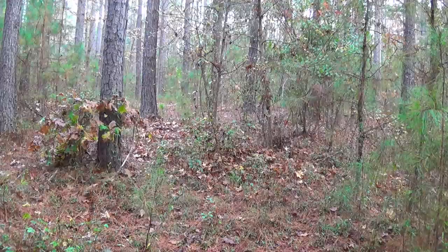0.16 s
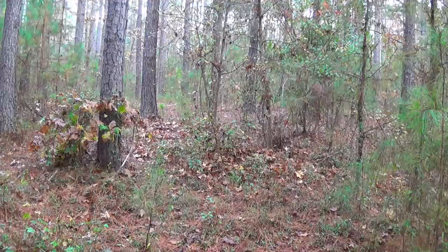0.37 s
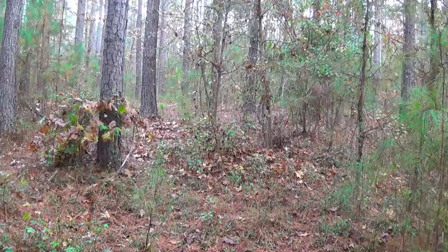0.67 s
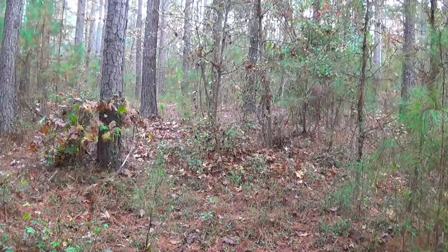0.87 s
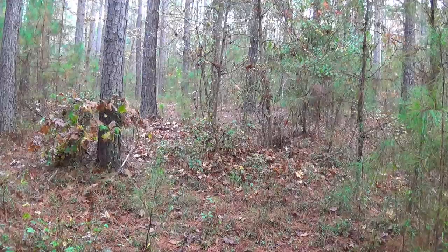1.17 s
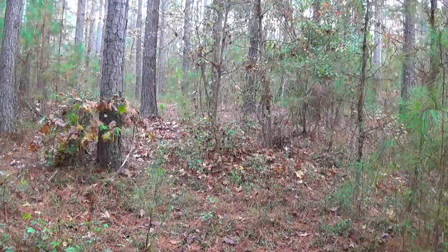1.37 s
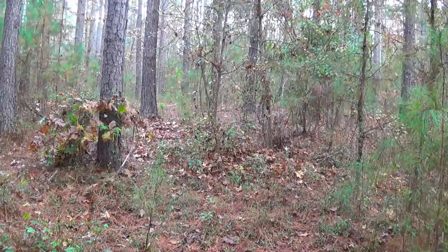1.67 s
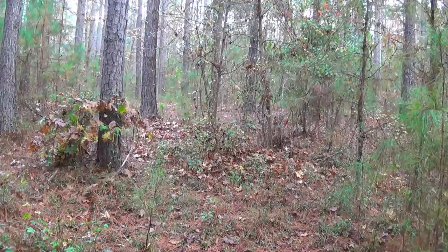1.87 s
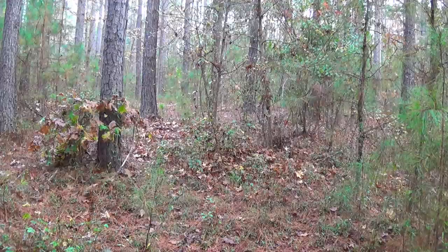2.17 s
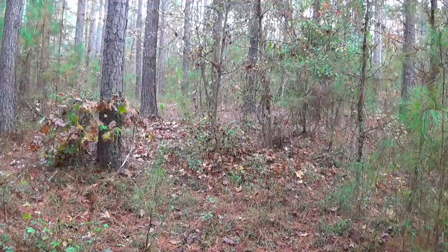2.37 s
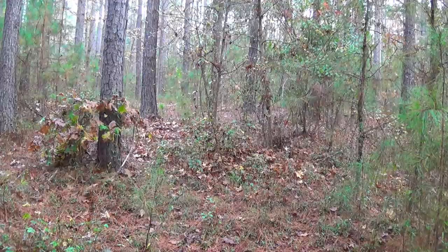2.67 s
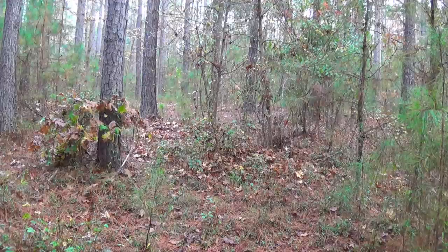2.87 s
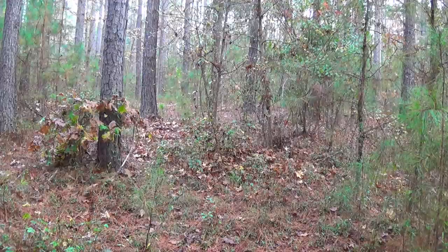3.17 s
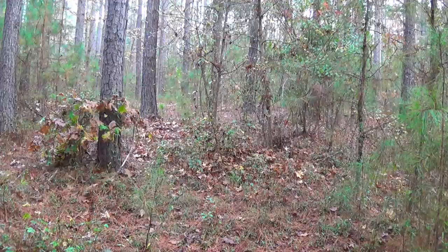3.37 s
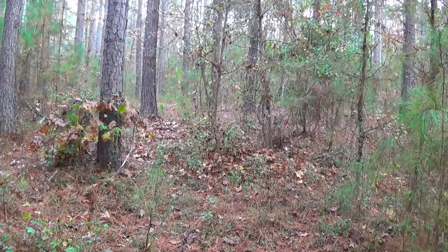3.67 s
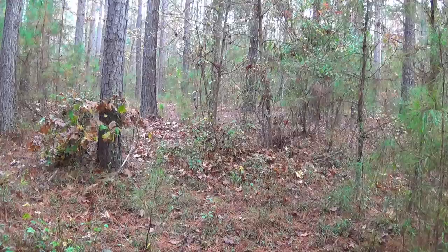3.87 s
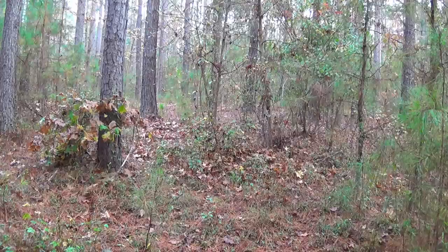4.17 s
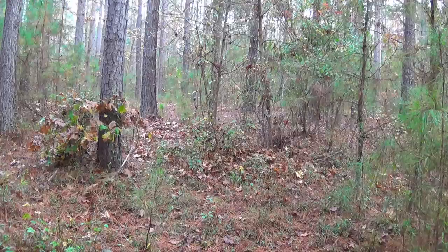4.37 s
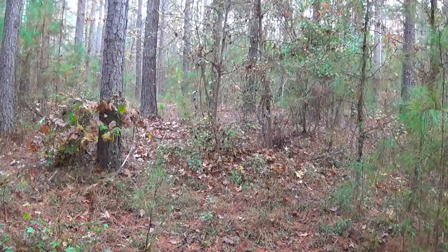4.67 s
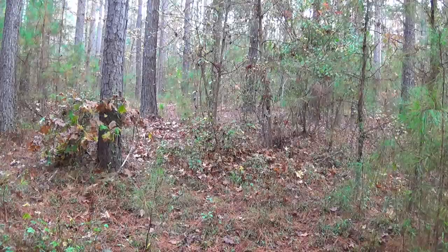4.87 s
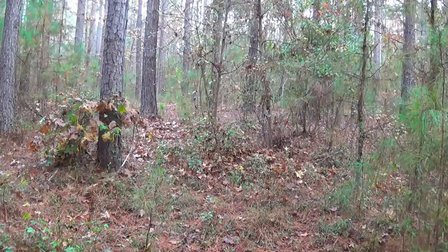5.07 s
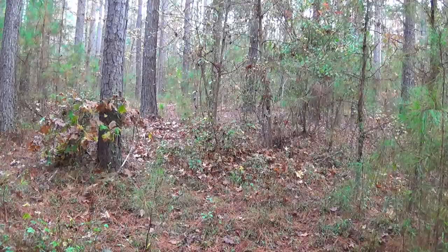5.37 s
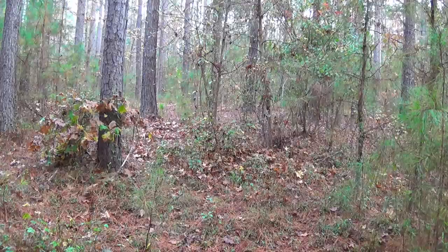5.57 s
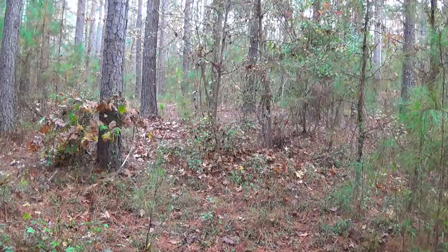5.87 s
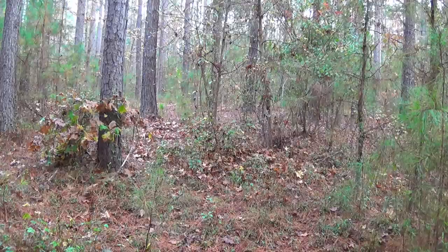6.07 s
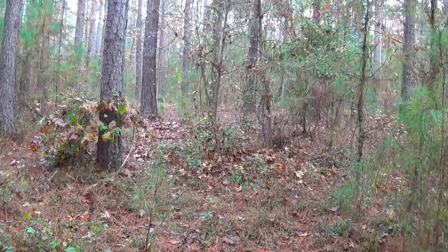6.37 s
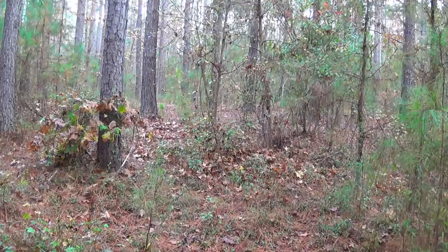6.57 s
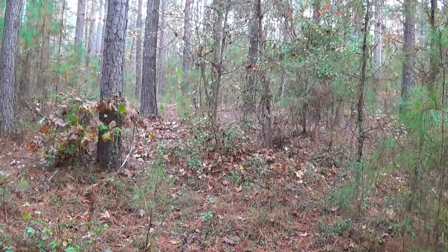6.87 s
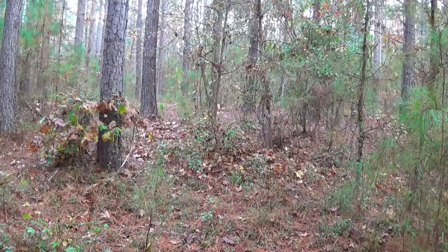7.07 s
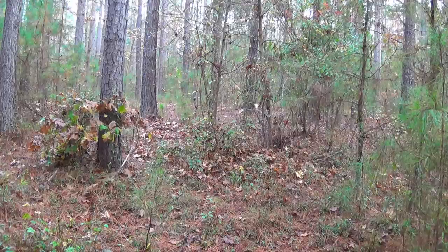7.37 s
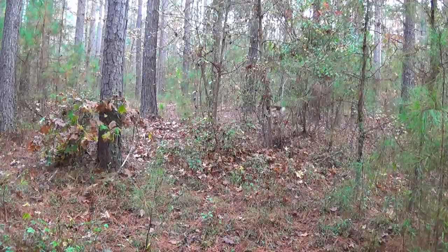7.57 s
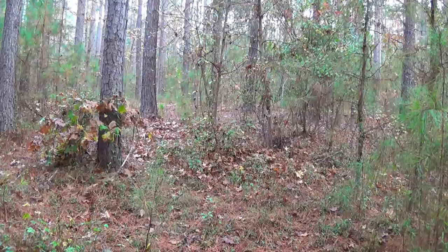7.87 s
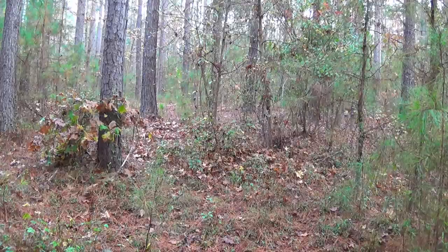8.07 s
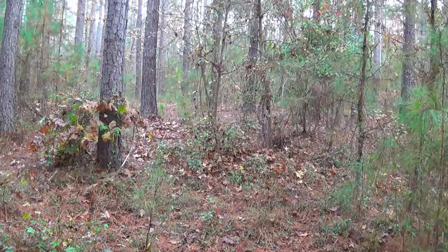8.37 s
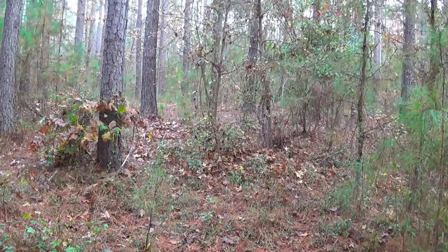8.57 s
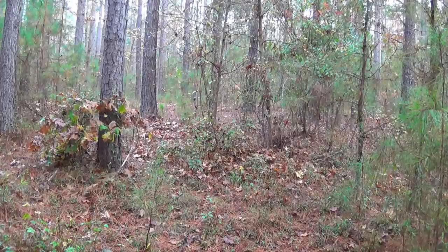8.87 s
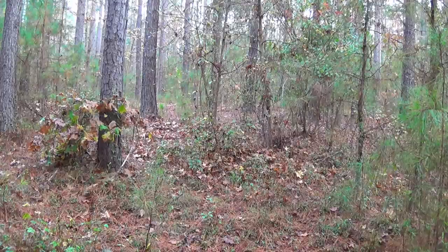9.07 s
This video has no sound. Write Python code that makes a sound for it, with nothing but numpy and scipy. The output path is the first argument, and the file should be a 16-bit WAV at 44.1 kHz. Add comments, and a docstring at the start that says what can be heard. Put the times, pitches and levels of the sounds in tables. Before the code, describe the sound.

Soft woodland air with a faint low rumble and light leaf rustle. From 0 to 2 s distant hounds give short, reverberant howls, mostly mid-pitched with a few higher, gradually strengthening, while small twigs tick at about 0.6, 1.2 and 1.7 s. At 2.1 s nearer dogs join, slightly right: brief bays flipping from a squeak to a hoarse chest note, and piercing yelps around 2.6, 3.0, 3.6 and 4.8 s. Bays continue at 4.0, 4.3, 5.1, 5.6 and 6.3 s, echoes ringing through the trunks. A twig snaps at 5.2 s; a tiny rising bird chip comes at 6.1 s. From 6.5 s fast paws approach, crunching dry leaves loudest at 7.2-7.6 s, with crisp cracks, the sharpest at 7.5 s. A last bay sounds at 7.7 s; footfalls recede, then far howls at 8.4 and 8.6 s fade into the echoing wood.

```python
"""Hounds in a pine wood

Hounds give tongue: yelps leap into a high register, bays break from a squeak into a hoarse low voice,
and others howl far off. Each cry is a harmonic series, roughened by subharmonics, noise and breath, and
filtered by a throat. Sparse decaying impulses are the trunks' echoes. Impulses and hiss are dry leaves,
loudest in crunches as a dog gallops past; noise bursts are cracks, nearly all of them snapping twigs,
a gliding sine is a bird's chip, and shaped noise is the air."""
import sys
import numpy as np
from scipy import signal
from scipy.fft import rfft, irfft, next_fast_len
from scipy.io import wavfile
from scipy.ndimage import uniform_filter1d

SR = 44100
rng = np.random.default_rng(int(sys.argv[2]) if len(sys.argv) > 2 else 0)


def bounce(signal):
    """Save signal as a 16-bit WAV file at the path given by the first command-line argument."""
    frames = np.transpose(np.atleast_2d(signal))
    limited = np.clip(frames, -1, 1)
    pcm = np.round(limited * 32767).astype(np.int16)
    wavfile.write(sys.argv[1], SR, pcm)


N = 406602
LEAD = SR // 2   # samples of cry that precede the scene
TIME = np.arange(N) / SR   # seconds

# Near yelps. Each row: start in seconds, length in seconds, scoop in Hz, leap in Hz, held pitch in Hz,
# scoop level in relative dB, main level in relative dB, last swell in relative dB,
# brightness in dB per octave, basic hoarseness (0-1), jaw opening (0-1).
YELP_CALLS = [(2.606, .122, 662, 1360, 1215, -25, -18.5, -26, 1.5, 0.21, 0.25),
              (3.047, 0.11, 806.2, 1327, 1235, -23.5, -18, -23.5, 2, 0.94, 0.54),
              (3.556, .112, 811, 1289, 1200, -23, -17, -20.5, 1, 0.37, 0.81),
              (4.838, 0.12, 797, 1203, 1179, -25.5, -21.5, -26.5, -3, 0.11, 0.36)]
# Near bays. Each row: start in seconds, squeak length in seconds, chest note length in seconds,
# squeak start in Hz, squeak end in Hz, sag in Hz, crest in Hz, end in Hz, crest place in the chest note (0-1),
# squeak level in dB, chest level in dB, crest level in dB, squeak brightness in dB per octave,
# chest brightness in dB per octave, basic hoarseness (0-1), mouth resonance in Hz.
BAY_CALLS = [(2.075, .027, 0.12, 944, 1256, 640, 700, 573, 0.63, -35, -31, -35.5, 3.5, 4, 0.48, 655),
             (2.541, 0.013, 0.056, 1245, 1240, 618, 653.5, 646, 0.76, -22.5, -27, -26.5, -0.5, 0, .8, 2300),
             (3.983, 0.045, 0.05, 689.7, 880.6, 550.7, 556.5, 500, 0.57, -21.5, -19, -22, 0, 4, 0.45, 1750),
             (4.254, 0.025, 0.075, 2216, 2269, 588.6, 559, 541.4, 0.46, -29.5, -30, -32, -4, 1, 0.5, 566),
             (5.124, .014, 0.096, 1282, 1195, 639, 710, 528.4, .55, -30, -23.5, -26.5, -3, -2, 0.5, 670),
             (5.574, .021, .104, 1168, 1205, 572, 689.6, 516, 0.8, -22.5, -23, -23, 2.5, 2, 0.67, 1390),
             (6.313, 0.036, 0.097, 1024, 1227, 615.8, 679.7, 558.6, 0.54, -27.5, -29.5, -29.5, -7.5, -2, 0.54, 652),
             (7.698, 0.026, 0.11, 1190, 1228, 590, 691, 529, 0.71, -29, -29, -30, 4.5, 0, 0.44, 1460)]
# Far howls. Each row: start in seconds, length in seconds, first pitch in Hz, last pitch in Hz,
# relative level in dB, brightness in dB per octave, hoarseness at the ends (0-1).
HOWL_CALLS = [(-.3, .3, 580, 660, -56, -18, 0.42), (.05, 0.37, 651, 620, -64.5, -27, 0.42),
              (.56, 0.22, 522, 586.5, -51.5, 1.5, .15), (.66, .2, 1264, 1173, -49, 9, 0.15),
              (1.1, 0.29, 580.3, 551.6, -47.5, 6, 0.46), (1.13, 0.18, 878, 949, -48, -5, 0.26),
              (1.48, 0.19, 551, 597.8, -42.5, 5, 0.48), (1.8, 0.152, 595, 566, -45, 5.5, 0.27),
              (7.15, .35, 603.5, 545.4, -52, 3.5, 0.4), (8.43, 0.19, 1211, 1130, -44.5, 4.5, 0.3),
              (8.6, 0.49, 616.5, 600, -50.5, 5.5, 0.48)]
NEAR_LEFT_DB, NEAR_ECHO_LEFT_DB, FAR_LEFT_DB = -5, -5.5, -0.2   # left minus right


def hounds(yelp_db=0.5, far_db=-9):
    """Direct-to-reverberant ratio: near dogs, to the right, sound directly too; far dogs mostly by echo."""
    near = from_db(yelp_db) * pack(YELP_CALLS, yelp) + pack(BAY_CALLS, bay)
    far = pack(HOWL_CALLS, howl)
    near_echo = wood(near, build_s=.04, early_db=-2, early_s=.1, likeness=.68, lumpy_db=2.5)
    far_echo = wood(far, build_s=0.0059, early_db=-21, early_s=0.038, likeness=0.89, lumpy_db=1.5)
    out = pan(near, NEAR_LEFT_DB) + pan(near_echo, NEAR_ECHO_LEFT_DB)
    out += pan(from_db(far_db) * far + far_echo, FAR_LEFT_DB)
    return out[:, LEAD:]


def pack(calls, rule):
    """Superposition: all cries of one kind are laid out in time and summed."""
    out = np.zeros(LEAD + N + SR)
    for call in calls:
        start, voice = cry(*rule(*call))
        out[LEAD + start:LEAD + start + len(voice)] += voice
    return out[:LEAD + N]


# Throat with nearly closed jaws. Each row: frequency in Hz, gain in dB.
YELP_FORMANTS = [(300, -44), (420, -8), (560, 2), (850, 4.5), (1200, 2), (1650, 5), (2000, 2), (2400, 0),
                 (2650, -0.5), (2950, -9), (3700, -18), (4200, -33), (4850, -28.5), (5600, -39),
                 (14000, -64)]
# Throat with wide open jaws. Each row: frequency in Hz, gain in dB.
SHRIEK_FORMANTS = [(400, -32), (580, 4), (850, 1), (1200, 2.5), (1650, -3.5), (2000, -8.5), (2500, -12),
                   (2900, -23.5), (3700, -19.5), (4200, -31), (4850, -17), (5600, -29), (14000, -48.5)]
BREAK_S = 0.00304   # half the time a change of register takes, in yelps and bays
CLEAR_HOARSE = .22   # share of the roughness left once the voice clears
# the run-up to the leap: length, pitch ratio, growth, added roughness
SCOOP_S, SCOOP_RISE, SCOOP_SWELL_DB, SCOOP_HOARSE = .018, 1.09, 9.5, 0.38
LEAP_DIP_DB, SETTLE_S = 8, 0.02375   # the voice is weak just after the leap, then settles
# past the middle the pitch lifts a little and the level drops
WAVER_SHARE, WAVER_RISE, WAVER_LOSS_DB = .67, 1.015, 6.5
# place of the last swell; pitch ratio, loss and roughness at the end
FALL_SHARE, FALL_RATIO, FALL_LOSS_DB, FALL_HOARSE = .84, .81, 4.5, 1


def yelp(s, length, scoop_hz, leap_hz, held_hz, scoop_db, level_db, swell_db, bright_db, hoarse, jaws):
    """Register leap: a scoop jumps high, wavers and falls raggedly, while the jaws set the resonances."""
    leap = s + SCOOP_S + 2 * BREAK_S
    clear = hoarse * CLEAR_HOARSE
    # each row of the course: s, Hz, dB, brightness, hoarseness
    course = [(s, scoop_hz, scoop_db - SCOOP_SWELL_DB, bright_db, hoarse / 2),
              (s + SCOOP_S, scoop_hz * SCOOP_RISE, scoop_db, bright_db, hoarse + SCOOP_HOARSE),
              (leap, leap_hz, level_db - LEAP_DIP_DB, bright_db, hoarse),
              (leap + SETTLE_S, held_hz, level_db, bright_db, clear),
              (s + WAVER_SHARE * length, held_hz * WAVER_RISE, level_db - WAVER_LOSS_DB, bright_db, hoarse),
              (s + FALL_SHARE * length, held_hz * np.sqrt(FALL_RATIO), swell_db, bright_db, clear),
              (s + length, held_hz * FALL_RATIO, swell_db - FALL_LOSS_DB, bright_db, FALL_HOARSE)]
    hz = np.geomspace(300, 14000, 200)
    jaws = np.clip(jaws, 0, 1)
    throat_db = (1 - jaws) * at_hz(YELP_FORMANTS, hz) + jaws * at_hz(SHRIEK_FORMANTS, hz)
    return sorted(course), np.column_stack([hz, throat_db])


# Throat of a baying dog. Each row: frequency in Hz, gain in dB.
BAY_FORMANTS = [(300, -49), (420, -37), (520, 2), (680, 4), (850, 1.5), (1100, 8.5), (1380, 3), (1700, 0),
                (2050, -1), (2400, -4.5), (2900, -23.5), (3700, -31), (6000, -36.5), (14000, -64)]
# landing in the low register: pitch ratio, loss of level, added roughness
BREAK_OVERSHOOT, BREAK_LOSS_DB, BREAK_HOARSE = 1.07, 6.5, 0.12
SQUEAK_SWELL_DB, SQUEAK_HOARSE = 5, 0.094   # the squeak grows and stays nearly pure
# places in the chest note of the sag and of clearing; share of the way to the crest on clearing
SAG_SHARE, CLEAR_SHARE, CLEAR_CLIMB = 0.244, .42, 0.655
CLEAR_LOSS_DB = 7.5   # loss of level as the voice clears
DROP_LOSS_DB, DROP_HOARSE = 4.5, 0.62   # the end of a bay
MOUTH_DB, MOUTH_OCTAVES = 4, 0.11   # height and width (standard deviation) of the mouth resonance


def bay(s, squeak_s, chest_s, from_hz, to_hz, sag_hz, crest_hz, end_hz, crest_share,
        squeak_db, level_db, crest_db, squeak_bright_db, bright_db, hoarse, mouth_hz):
    """Register break: a squeak drops to a rough chest note that clears towards a crest and frays at the end."""
    crack, clear = s + squeak_s, hoarse * CLEAR_HOARSE
    clear_hz = sag_hz + CLEAR_CLIMB * (crest_hz - sag_hz)
    landing_db = level_db - BREAK_LOSS_DB
    # each row of the course: s, Hz, dB, brightness, hoarseness
    course = [(s, from_hz, squeak_db - SQUEAK_SWELL_DB, squeak_bright_db, SQUEAK_HOARSE),
              (crack - BREAK_S, to_hz, squeak_db, squeak_bright_db, SQUEAK_HOARSE),
              (crack + BREAK_S, sag_hz * BREAK_OVERSHOOT, landing_db, bright_db, hoarse + BREAK_HOARSE),
              (crack + SAG_SHARE * chest_s, sag_hz, level_db, bright_db, hoarse),
              (crack + CLEAR_SHARE * chest_s, clear_hz, level_db - CLEAR_LOSS_DB, bright_db, clear),
              (crack + crest_share * chest_s, crest_hz, crest_db, bright_db, clear),
              (crack + chest_s, end_hz, crest_db - DROP_LOSS_DB, bright_db, DROP_HOARSE)]
    hz = np.geomspace(300, 14000, 200)
    mouth = MOUTH_DB * np.exp(-(np.log2(hz / mouth_hz) / MOUTH_OCTAVES) ** 2 / 2)
    return sorted(course), np.column_stack([hz, at_hz(BAY_FORMANTS, hz) + mouth])


# Throat of a howling dog. Each row: frequency in Hz, gain in dB.
HOWL_FORMANTS = [(420, -4.5), (540, 9), (850, -15.5), (1200, 9), (1620, -5.5), (1850, -25), (2400, -10.5),
                 (2900, -36), (8000, -43)]
HOWL_ARCH = 1.005   # pitch bulge at mid-howl, as a ratio


def howl(s, length, from_hz, to_hz, level_db, bright_db, hoarse):
    """Pitch glide: one slightly arched course at an even level, clearer in the middle."""
    course = [(s, from_hz, level_db, bright_db, hoarse),
              (s + length / 2, HOWL_ARCH * (from_hz + to_hz) / 2, level_db, bright_db, hoarse / 2),
              (s + length, to_hz, level_db, bright_db, hoarse)]
    return course, HOWL_FORMANTS


def cry(rows, throat, jitter=.011, attack=.004, release=0.0078):
    """Source and filter: vocal folds, with subharmonics and irregularity when hoarse, excite a throat."""
    s, hz, level_db, bright_db, hoarse = np.transpose(rows)
    start = int((s[0] - attack) * SR)
    t = np.arange(start, int((s[-1] + release) * SR)) / SR
    n = len(t)
    hoarse = np.clip(hoarse, 0, 1)
    hz, level_db, bright_db, hoarse = [np.interp(t, s, c) for c in (hz, level_db, bright_db, hoarse)]
    step = 2 * np.pi * hz * (1 + jitter * wander(72.4, n)) / SR
    # cycles vary in twos in the high register, in threes in the low: side lines between the harmonics
    uneven = np.sin(np.cumsum(step / np.where(hz > 1000, 2, 3)) + .7 * wander(30, n))
    phase = np.cumsum(step) + hoarse * (.6 * uneven + .36 * wander(170, n))
    lags = rng.uniform(0, 2 * np.pi, 17)   # the throat delays each harmonic differently
    folds = np.zeros(n)
    for k in range(1, 17):
        audible = k * hz < SR / 3
        folds += from_db(bright_db * np.log2(k)) * np.cos(k * phase + lags[k]) * audible
    folds = folds * (1 + hoarse * (.55 * uneven + .35 * wander(300, n)))
    # air rushes through while the folds are open
    rush = (.15 + .45 * hoarse) * rng.standard_normal(n) * (1 + np.cos(phase))
    voice = colour(folds + rush * from_db(bright_db), throat)
    voice /= np.sqrt(uniform_filter1d(voice ** 2, size=400) + 1e-12)   # even out, then set the level
    gate = np.interp(t, [t[0], s[0], s[-1], t[-1]], [0, 1, 1, 0])
    return start, voice * gate * from_db(level_db)


# Tone of the wood's echo. Each row: frequency in Hz, gain in dB.
ECHO_TONE = [(300, 3.5), (600, 2.5), (850, 0), (1250, 2), (1700, -3), (2400, -1), (3200, -7.5), (8000, -6)]
# Reverberation time of the wood. Each row: frequency in Hz, time to decay by 60 dB in seconds.
ECHO_DECAY = [(500, 3.16), (1250, 2.39), (2400, 1.14), (4000, 0.83), (10000, 0.16)]


def wood(x, build_s, early_db, early_s, likeness, lumpy_db):
    """Multiple scattering: echoes off trunks grow denser with time and die away, treble first."""
    t = np.arange(2 * SR) / SR
    echoes_per_s = 500 + 8000 * t
    trunks = rng.standard_normal((2, len(t))) * (rng.random((2, len(t))) < echoes_per_s / SR)
    trunks *= from_db(lumpy_db * np.clip(rng.standard_normal(trunks.shape), -2, 2))
    trunks = rms_one(trunks / np.sqrt(echoes_per_s))
    swell = (1 - np.exp(-t / build_s)) * (1 + from_db(early_db) * np.exp(-t / early_s))
    edges = np.geomspace(300, 12000, 13)
    echo = 0
    for low, high in zip(edges, edges[1:]):
        hz = np.sqrt(low * high)
        band = signal.sosfilt(signal.butter(2, [low, high], "band", fs=SR, output="sos"), trunks)
        band = band * swell * from_db(-60 * t / at_hz(ECHO_DECAY, hz))
        # energy in proportion to bandwidth
        band *= np.sqrt(2 * (high - low) / SR / np.sum(band ** 2, axis=1, keepdims=True))
        echo = echo + from_db(at_hz(ECHO_TONE, hz)) * stereo(*band, likeness)
        trunks = -trunks[::-1]   # neighbouring bands get unrelated echoes
    return signal.fftconvolve(x[None], echo, axes=1)[:, :len(x)]


# Leaves stirred by the pack. Each row: time in seconds, relative level in dB.
STIRRED_LEAVES = [(0.0, -60.5), (3.82, -53), (4.6, -56.5), (5.1, -49), (5.42, -55), (6.11, -51.5),
                  (8.3, -50.5), (9.22, -58.5)]
# Heavy landings in deep litter. Each row: start in seconds, relative level in dB, decay length in seconds.
HEAVY_LANDINGS = [(7.174, -48.5, 0.048), (7.232, -45, 0.056), (7.352, -38.5, 0.045), (7.402, -42, 0.061),
                  (7.558, -44.5, 0.088), (7.7, -49, 0.12), (8.264, -51.5, 0.058)]
RUSTLE_FLICKER_DB = 1.4   # spread of the rustle's level


def leaves(stir_db=-6.0, paw_db=1.0, rise_s=0.0026):
    """Addition of powers: a loose rustle, and under each paw a crunch that swells quickly and settles."""
    stir_level = np.interp(TIME, *np.transpose(STIRRED_LEAVES)) + stir_db
    stir = from_db(stir_level + RUSTLE_FLICKER_DB * wander(7.2, N))
    power = stir ** 2
    for s, level_db, length in gallop() + list(HEAVY_LANDINGS):
        age = np.maximum(TIME - s, 0)
        rise = 1 - np.exp(-age / rise_s)
        settle = np.exp(-np.minimum(age / length, 6) ** 2 / 2)
        power += (from_db(level_db + paw_db) * rise * settle) ** 2
    return np.sqrt(power) * crackle(per_s=5000, spread_db=1.0, hiss=0.41)


# the near dog: when it is closest, how close, how fast
PASS_S, PASS_DISTANCE_M, RUN_M_PER_S = 7.43, 1.46, 6.2
RUN_FROM_S, RUN_TO_S, PAWS_PER_S, PAW_SCATTER_S = 6.5, 8.2, 10, 0.011
PAW_DB, PAW_S = -50, 0.053   # an ordinary footfall at the closest point, in relative dB; its decay length


def gallop():
    """Inverse distance law: nearly even footfalls of the dog that runs past grow louder as it nears."""
    s = np.arange(RUN_FROM_S, RUN_TO_S, 1 / PAWS_PER_S)
    s = s + PAW_SCATTER_S * rng.standard_normal(len(s))
    distance = np.hypot(PASS_DISTANCE_M, RUN_M_PER_S * (s - PASS_S))
    level_db = PAW_DB - 20 * np.log10(distance / PASS_DISTANCE_M)
    return list(zip(s, level_db, np.full(len(s), PAW_S)))


# Spectrum of dry leaves. Each row: frequency in Hz, gain in dB.
LEAF_SPECTRUM = [(200, -70), (900, -18), (2000, -11), (3500, -2), (5000, -2), (6800, -9), (8500, -1),
                 (10500, 0), (13000, -2.5), (15500, -14)]


def crackle(per_s, spread_db, hiss):
    """Shot noise: countless tiny breaks of dry leaf over a hiss, alike in both ears; rms 1."""
    sizes = from_db(spread_db * np.minimum(rng.exponential(1, N), 4))
    breaks = rms_one(sizes * rng.choice([-1, 1], N) * (rng.random(N) < per_s / SR))
    return rms_one(colour(breaks + hiss * rng.standard_normal(N), LEAF_SPECTRUM))


# Short cracks: snapping twigs, save the last row, which is only a faint, dull click.
# Each row: start in seconds, relative peak of the bright band in dB,
# relative strength of the middle band against the bright one in dB.
CRACK_EVENTS = [(0.649, -41.5, 1), (1.2036, -39.5, -1.5), (1.703, -45.5, -2), (3.9015, -47, -23),
                (5.166, -38, 3.5), (6.066, -47, 4), (7.2793, -33, -14), (7.531, -25.5, -36),
                (7.6302, -33, -9), (7.829, -38, 1), (8.01, -48, 10)]


def cracks(crack_db=8.5, middle_db=-3):
    """Impulsive excitation: a very short bright noise burst with a duller middle and a weak, longer tail."""
    out, t = np.zeros(N), np.arange(SR // 20) / SR
    shape = np.exp(-t / .0014) + from_db(-22) * np.exp(-t / .008)
    top_band = signal.butter(2, [8000, 13500], "band", fs=SR, output="sos")
    middle_band = signal.butter(2, [2600, 6000], "band", fs=SR, output="sos")
    for s, peak_db, strength_db in CRACK_EVENTS:
        burst = rng.standard_normal(len(t)) * shape
        bright, middle = signal.sosfilt(top_band, burst), signal.sosfilt(middle_band, burst)
        crack = bright / np.abs(bright).max()
        crack += from_db(strength_db + middle_db) * middle / np.abs(middle).max()
        out[int(s * SR):int(s * SR) + len(t)] += from_db(peak_db + crack_db) * crack
    return out


# A small bird's chip. Each row: time in seconds, pitch in Hz, level in dB.
BIRD_CHIP = [(6.12, 4310, -60), (6.14, 4550, -51.5), (6.159, 4630, -58)]


def bird():
    """Frequency modulation: one thin chip is a sine whose pitch rises."""
    s, hz, level_db = np.transpose(BIRD_CHIP)
    phase = 2 * np.pi * np.cumsum(np.interp(TIME, s, hz)) / SR
    return np.interp(TIME, s, from_db(level_db), left=0, right=0) * np.sin(phase)


# Spectrum of still air and a far rumble. Each row: frequency in Hz, gain in dB.
AIR_SPECTRUM = [(20, -13.5), (45, -6), (75, -5), (140, 2.5), (190, -6), (260, -4), (400, -8.5), (800, -1),
                (1600, -5), (3000, -11.5), (5200, -13.5), (6800, -17), (11000, -26), (16000, -28.5)]
# Likeness of the two ears. Each row: frequency in Hz, left-right correlation.
AIR_CORRELATION = [(60, 0.97), (150, 0.98), (300, 0.53), (1000, 0.58), (5000, 0.35), (10000, 0.53)]
AIR_DB = -56.5   # level before the slow swell


def air():
    """Partly coherent noise: a background alike in both ears in the bass, which slowly swells and eases."""
    mid, side = rfft(rng.standard_normal((2, N)))
    likeness = at_hz(AIR_CORRELATION, np.arange(len(mid)) * SR / N)
    swell_db = np.interp(TIME, [1.5, 2.5, 8, 9.2], [-0.5, 5.0, 4.5, 2.5])
    noise = irfft(stereo(mid, side, likeness), N)
    return from_db(AIR_DB + swell_db) * rms_one(colour(noise, AIR_SPECTRUM))


def from_db(db):
    """Logarithmic level: decibels to amplitude gain."""
    return 10 ** (np.asarray(db) / 20)


def rms_one(x):
    """Normalisation: scale to unit rms."""
    return x / np.sqrt(np.mean(x ** 2) + 1e-20)


def at_hz(points, hz):
    """Logarithmic pitch: read a table of points on a log-frequency axis."""
    f, value = np.transpose(points)
    return np.interp(np.log(np.maximum(hz, 1)), np.log(f), value)


def colour(x, spectrum):
    """Linear filtering: multiply the spectrum by a smooth gain in dB."""
    n = x.shape[-1]
    size = next_fast_len(n + 2048)
    gain = from_db(at_hz(spectrum, np.arange(size // 2 + 1) * SR / size))
    return irfft(rfft(x, size) * gain, size)[..., :n]


def wander(rate_hz, size):
    """Low-passed noise: smooth chance of spread about 1 that changes at about the given rate."""
    sos = signal.butter(2, min(rate_hz, SR / 4), fs=SR, output="sos")
    return rms_one(signal.sosfilt(sos, rng.standard_normal(size + SR // 4)))[-size:]


def stereo(mid, side, likeness):
    """Interaural correlation: two unrelated signals make a pair with the given correlation."""
    c = np.clip(likeness, -1, 1)
    return np.sqrt((1 + c) / 2) * mid + np.sqrt((1 - c) / 2) * side * np.array([[1], [-1]])


def pan(x, left_db):
    """Level difference between the ears: positive leans left, negative right."""
    return x * from_db(left_db * np.array([[.5], [-.5]]))


def scene():
    """Superposition: hounds, leaves underfoot, cracks, a bird and the air add up."""
    return hounds() + leaves() + cracks() + bird() + air()


def record(dry):
    """Band limitation: a steep elliptic low-pass removes the top above 15.9 kHz."""
    return signal.sosfilt(signal.ellip(10, .1, 80, 15900, fs=SR, output="sos"), dry)


dry = scene()
out = record(dry)
bounce(out)
```